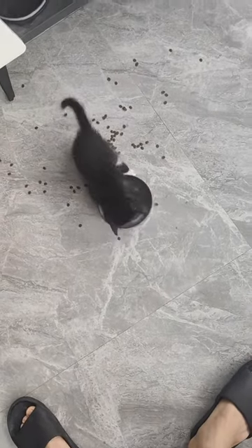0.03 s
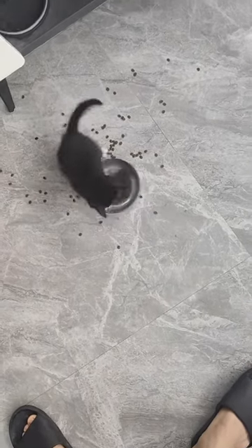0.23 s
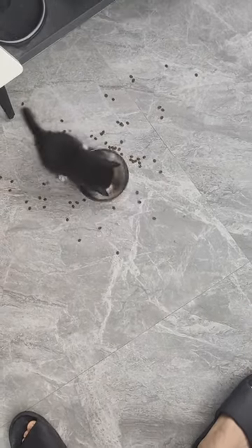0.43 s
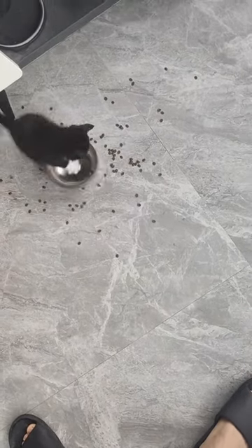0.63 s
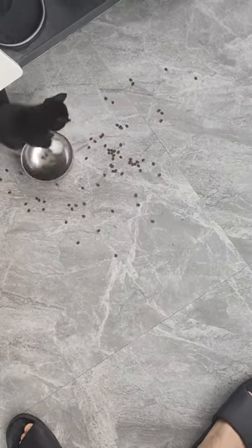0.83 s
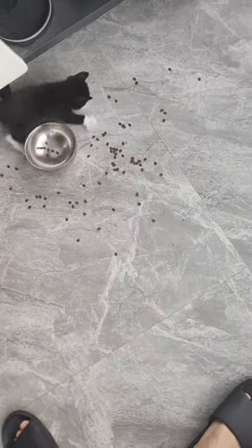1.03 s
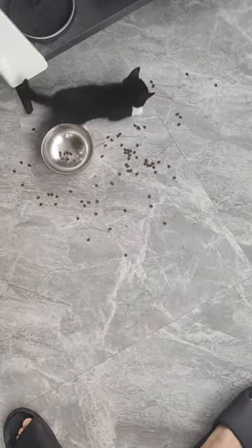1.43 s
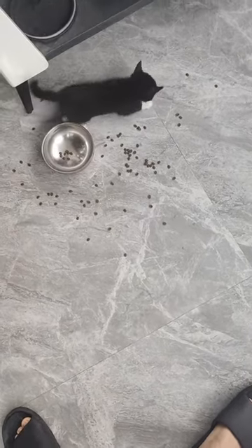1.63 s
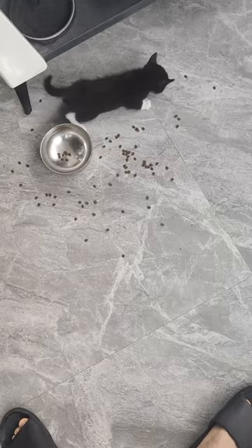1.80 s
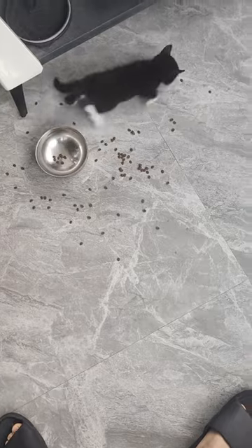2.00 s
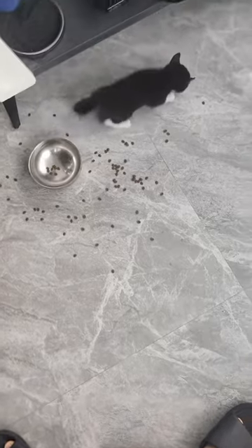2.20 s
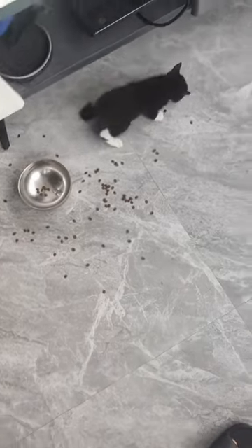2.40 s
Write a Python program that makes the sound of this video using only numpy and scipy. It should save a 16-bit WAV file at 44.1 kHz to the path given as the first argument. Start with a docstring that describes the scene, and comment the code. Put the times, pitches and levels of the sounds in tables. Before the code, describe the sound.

Close by indoors, a metal food bowl judders and clatters across tiles, with a little kibble shifting. It then wobbles on its rim, ringing as it settles, and leaves a low hum dying away over faint room rumble.

```python
"""Steel bowl on tile

Close by, in a hard-walled room, a kitten shoves a steel food bowl over the tiled floor. Its foot
judders, knocks and squeals; let go, the bowl drops back, rocks to rest with a sinking ring and hums
on in a low, beating tone. Kibble shifts, a paw lands, and a faint room rumble lies below. The bowl is
straight ahead of the microphone; only the treble of the reverberation spreads to the sides."""
import sys
import numpy as np
from scipy import signal
from scipy.fft import rfft, irfft
from scipy.io import wavfile

SR = 44100
rng = np.random.default_rng(int(sys.argv[2]) if len(sys.argv) > 2 else 0)


def transcribe(signal):
    """Save signal, clipped to [-1, 1], as a 16-bit WAV file at the path in sys.argv[1]."""
    frames = np.atleast_2d(signal).T
    limited = np.clip(frames, -1, 1)
    pcm = np.round(limited * 32767).astype(np.int16)
    wavfile.write(sys.argv[1], SR, pcm)


N = 112454
T = np.arange(N) / SR


# The foot scraping over the floor. Each row: time in seconds, relative force in dB.
PUSH_FORCE = [(0, -38.5), (.09, -51), (.2, -35.5), (.232, -19), (.285, -12.5), (.31, -32.5), (.34, -30.5),
              (.375, -21), (.41, -15), (.455, -13), (.55, -10), (.6, -13), (.66, -22), (.755, -29),
              (.77, -28), (.8, -13.5), (.84, -26.5), (.895, -8.5), (.955, -13), (.98, -53.5), (1.11, -60.5)]
# The rim rolling on the tile once free. Each row: time in seconds, relative force in dB.
ROLL_FORCE = [(1.125, -9), (1.21, -17), (1.29, -13.5), (1.345, -20.5), (1.385, -13.5), (1.44, -18.5),
              (1.485, -18.5), (1.52, -26), (1.6, -28.5), (1.65, -44), (1.7, -80)]
# The shell's contact noise, heard close. Each row: frequency in Hz, relative level in dB.
SHELL_SPECTRUM = [(60, -47.5), (150, -36.5), (240, -5), (450, -7.5), (800, -2), (1100, -2.5), (1350, -7),
                  (1530, -19), (1950, -13), (2450, -4), (2780, -7), (3030, -3.5), (3190, -15.5), (3380, -2),
                  (3700, -8), (4250, -19), (5000, -13.5), (5750, -24.5), (6400, -15.5), (7500, -18),
                  (9000, -22), (10500, -21.5), (14000, -35)]

def bowl(scrape_db=-4, roll_db=-5, pushed_ring_db=-4, free_ring_db=-7):
    """Scraping, rolling and knocks sound the shell broadly and ring its modes."""
    push = force(PUSH_FORCE) * slips()
    roll = force(ROLL_FORCE) * wobble() * slips()
    hits, blows = knocks()
    contact = colour(from_db(scrape_db) * push + from_db(roll_db) * roll + hits, SHELL_SPECTRUM)
    free = T > PUSH_FORCE[-1][0] - .02
    pushed_force = from_db(pushed_ring_db) * (push + blows * ~free)
    free_force = from_db(free_ring_db) * (roll + blows * free)
    return contact, shell_modes(pushed_force, free_force)


def slips(per_s=1400, spread_db=3.5, judder_hz=75.4, judder_db=3.5):
    """Tiny stick-slip clicks that come in juddering clumps; rms 1."""
    sizes = from_db(spread_db * np.minimum(rng.exponential(1, N), 4)) * rng.choice([-1, 1], N)
    judder = rms_one(butter(rng.standard_normal(N), judder_hz, "low"))
    slipping = rng.random(N) < per_s / SR
    return rms_one(sizes * slipping * from_db(judder_db * np.clip(judder, -2, 2)))


def wobble(start_hz=18, doubling_s=.3, depth_db=3.5):
    """Gain of the rocking, which speeds up as the bowl settles."""
    rate = start_hz * 2 ** (np.clip(T - ROLL_FORCE[0][0], 0, .5) / doubling_s)
    return from_db(depth_db * np.sin(2 * np.pi * np.cumsum(rate) / SR))


# Steel knocks on tile in front of the microphone.
# Each row: start in seconds, relative level in dB, offset for the ring in dB.
TILE_KNOCKS = [(0.16, -29.5, 3.5), (.204, -14.5, -2), (.229, -16, -3.5), (0.344, -14, -3),
               (.419, -12.5, 12), (0.452, -11.5, -29), (0.515, -29, 23.5), (0.532, -4, -12.5),
               (.764, -4.5, -7), (0.783, -4, -2), (0.852, -9.5, -5), (0.945, -10.5, 4.5), (0.955, -9.5, 6),
               (1.02, -18, 9.5), (1.124, -10, 7), (1.194, -17.5, 21.5), (1.249, -9, 8), (1.357, -14.5, 13),
               (1.415, -5, -19), (1.465, -7, 1.5), (1.501, -21.5, 13.5), (1.576, -14.5, 0.5)]

def knocks(decay_s=.0051, click=.83):
    """Each knock is a click and a few milliseconds of chatter: force on the shell and on its modes."""
    hits, blows, chatter = np.zeros(N), np.zeros(N), rng.standard_normal(N)
    for s, db, ring_db in TILE_KNOCKS:
        start = int(s * SR)
        hit = from_db(db) * chatter[start:] * np.exp(-T[:N - start] / decay_s)
        hit[0] = from_db(db) * click
        hits[start:] += hit
        blows[start] += from_db(db + ring_db) * np.sqrt(decay_s * SR)
    return hits, blows


# The bowl's modes. Each row: frequency in Hz, gain in dB while pushed, gain in dB when free,
# T60 in seconds, share of the tilt glide.
BOWL_MODES = [(526, -13, -20, .25, 0), (905, -7, -12, .17, 1), (1050, -12, -16, .2, 0),
              (1114, -11, -11, .22, .5), (1715, -11, -19, .25, .5), (1776, -12, -26, .32, 0),
              (2210, -19, -21, .7, 0), (2410, -13, -13, .22, .4), (2545, -12, -14, .22, .4),
              (2953, -20, -12, .35, 0), (3025, -19, -14, .3, 0), (3357, -12, -14, .26, 0),
              (3535, -16, -11, .25, .1), (3768, -16, -24, .25, 0), (3914, -20, -28, .25, 0),
              (4490, -22, -25, .35, .1), (4717, -26, -31, .25, 0), (6230, -27, -27, .2, .2),
              (6380, -21, -20, .2, .2), (6920, -26, -25, .2, 0)]

def shell_modes(pushed_force, free_force):
    """The steel rings with one balance of modes while pushed and another when free."""
    out = np.zeros(N)
    for hz, pushed_db, free_db, t60, share in BOWL_MODES:
        drive = from_db(pushed_db) * pushed_force + from_db(free_db) * free_force
        out += ring(drive, tilted(hz, share), t60)
    return out


# The glide as the bowl tilts on the floor. Each row: time in seconds, pitch change in percent.
TILT_GLIDE = [(.25, -1), (.55, 1.5), (.8, -2), (.97, 2.2), (1.12, -.5), (1.21, .3), (1.29, -1.8),
              (1.39, -2.2), (1.5, -4.8), (1.6, -7.5)]

def tilted(hz, share):
    """A mode's pitch follows its share of the glide, sinking as the bowl settles flat."""
    glide = np.interp(T, *np.transpose(TILT_GLIDE)) / 100
    return hz * (1 + share * glide)


# The two singing partials. Each row: frequency in Hz, share of the tilt glide.
SINGING_PARTIALS = [(904, 1), (1735, .5)]
# The freed bowl rocks on the spot. Each row: middle in seconds, length in seconds,
# level of the lower partial in dB, level of the upper in dB.
BOWL_ROCKS = [(1.138, 0.041, -16, -31), (1.204, 0.12, -14.5, -31.5), (1.274, 0.063, -15, -24),
              (1.329, 0.056, -18, -23), (1.386, 0.074, -12, -25), (1.434, 0.045, -17, -19),
              (1.488, 0.058, -24, -28.5), (1.569, 0.12, -27.5, -33.5)]

def singing(width_hz=3):
    """The rocking bowl sings in two partials, swelling with each rock and sinking in pitch."""
    lower, upper = (wavering(tilted(hz, share), width_hz) for hz, share in SINGING_PARTIALS)
    return sum(arch(s - length / 2, length) * (from_db(lower_db) * lower + from_db(upper_db) * upper)
               for s, length, lower_db, upper_db in BOWL_ROCKS)


# Close, dry pings. Each row: start in seconds, frequency in Hz, level in dB, T60 in seconds.
MODE_PINGS = [(.345, 520, -22, .3), (.06, 2530, -37, .4), (.068, 3650, -35, .35), (.081, 900, -39, .4),
              (.09, 3070, -34, .35), (.155, 3590, -28, .25), (.205, 820, -19, .2), (.229, 520, -25, .5),
              (.229, 925, -17, .4), (.229, 1716, -22, .4), (.345, 900, -20, .25), (.345, 2555, -27, .4),
              (.419, 581, -20, .7), (.455, 3357, -13, .4), (.514, 6400, -24, .25), (.531, 2555, -18, .3),
              (.531, 990, -13, .2), (.764, 880, -11, .15), (.775, 4485, -20, .35), (.853, 3350, -15, .25),
              (.943, 1720, -19, .35), (1.124, 3535, -9, .28), (1.249, 3535, -14, .22),
              (1.357, 6925, -26, .3), (1.413, 2953, -19, .25), (1.465, 3000, -16, .2)]

def pings():
    """A contact singles out one mode of the bowl."""
    return sum(struck(*row) for row in MODE_PINGS)


# The bowl's long hum. Each row: frequency in Hz, relative level in dB, T60 in seconds.
HUM_MODES = [(581, -22.5, 1.7), (570.8, -25.5, 1.7), (2195, -40, 1.4)]
# The blows that set it going. Each row: start in seconds, gain in dB.
HUM_STRIKES = [(.935, -2), (1.4255, -7)]

def hum():
    """A close pair of low modes rings long and beats, under a faint overtone."""
    return sum(struck(s, hz, db + blow_db, t60) for s, blow_db in HUM_STRIKES for hz, db, t60 in HUM_MODES)


def overtones(contact, count=600, low_hz=5946, high_hz=13700, t60=.24, db=-9):
    """The thin shell's many weak high modes, scattered at random, make each contact metallic."""
    t = T[:SR // 2]
    pitch, phase, strength = rng.random((count, 3)).T[:, :, None]
    hz = low_hz + pitch * (high_hz - low_hz)
    response = np.sum(strength * np.sin(2 * np.pi * (hz * t + phase)), axis=0) * decay(t, t60)
    return from_db(db) * convolve_unit(contact, response)


# Skids down at the tile. Each row: start in seconds, length in seconds, relative level in dB.
EDGE_SKIDS = [(0, 0.0073, -26), (0.212, 0.033, -28), (0.227, 0.014, -25.5), (0.348, 0.003, -21.5),
              (0.362, 0.029, -15), (0.402, 0.02, -24), (0.62, 0.017, -19), (0.638, 0.03, -19.5),
              (0.668, 0.029, -27), (0.72, 0.008, -14), (0.802, 0.035, -23), (0.846, 0.014, -21.5),
              (0.855, 0.022, -17), (0.901, 0.0042, -17.5)]
# Their hiss from nearby. Each row: frequency in Hz, relative level in dB.
SKID_SPECTRUM = [(200, -58), (4000, -19), (5800, -13.5), (7200, 2), (8600, -2), (10500, 0.5), (12000, -4.5),
                 (14000, -11)]

def skids(attack_s=.001, release_s=.0021):
    """The steel edge catches and skids with a short bright hiss."""
    envelope = sum(from_db(db) * burst(s, length, attack_s, release_s) for s, length, db in EDGE_SKIDS)
    return envelope * colour(rng.standard_normal(N), SKID_SPECTRUM)


# Squeals near the microphone, with little room on them.
# Each row: start in seconds, length in seconds, frequency in Hz, relative level in dB.
EDGE_SQUEALS = [(.364, .06, 7500, -27.5), (.385, .075, 9450, -26.5), (.633, .04, 8460, -16.5),
                (.64, .07, 9400, -24), (.722, .014, 7600, -10.5), (.857, .045, 8150, -18),
                (.859, .066, 6868, -14.5)]

def squeals(upper_ratio=1.905, upper_db=-10, width_hz=130):
    """The sticking edge gives a rough two-partial squeal that stops when it lets go."""
    out = np.zeros(N)
    for s, length, hz, db in EDGE_SQUEALS:
        tone = wavering(hz, width_hz) + from_db(upper_db) * wavering(hz * upper_ratio, width_hz)
        out += from_db(db) * burst(s, length, attack_s=.001, release_s=.006) * tone
    return out


# Kibble shifts in the bowl and on the floor. Each row: start in seconds, length in seconds,
# relative level in dB, band centre in Hz, bandwidth in Hz.
KIBBLE_SHIFTS = [(0.02, 0.16, -37, 3400, 1210), (0.048, 0.15, -32, 9000, 5500), (1.8, 0.05, -66, 7270, 900),
                 (2.028, 0.16, -63.5, 6880, 2453), (2.42, 0.16, -66, 2890, 80)]
# The last quick rocks thrum and ring thinly against the floor. Each row reads as for the kibble.
RIM_THRUM = [(1.56, .21, -42, 331, 200), (1.58, 0.064, -42.5, 4530, 110)]

def rustle(rows):
    """Short swells of tiny contacts in one band: sliding pellets, or the rim's last thrum."""
    out, grit = np.zeros(N), slips()
    for s, length, db, hz, width_hz in rows:
        band = butter(grit, [max(hz - width_hz / 2, 100), hz + width_hz / 2], "band")
        out += from_db(db) * np.sqrt(arch(s, length)) * rms_one(band)
    return out


# One soft step on the tile. Each row: start in seconds, level in dB, frequency in Hz.
PAW_STEPS = [(2.345, -46, 518)]

def paws(rise_s=.015, width_hz=79):
    """A padded paw lands with a dull pat."""
    out = np.zeros(N)
    for s, db, hz in PAW_STEPS:
        age = np.maximum(T - s, 0) / rise_s
        out += from_db(db) * age * np.exp(1 - age) * wavering(hz, width_hz)
    return out


def room(x, t60=.42, bass_t60=.21, bass_hz=390, delay_s=.0029):
    """The hard walls return a diffuse tail of unit power; its bass dies sooner."""
    t, noise = T[:SR], rng.standard_normal(SR)
    bass = signal.sosfiltfilt(signal.butter(2, bass_hz, fs=SR, output="sos"), noise, padtype=None)
    tail = bass * decay(t, bass_t60) + (noise - bass) * decay(t, t60)
    return convolve_unit(x, tail * (t > delay_s))


# Room tone at the microphone. Each row: frequency in Hz, relative level in dB.
AIR_SPECTRUM = [(25, -17.5), (50, -5), (95, -10), (130, -9), (180, -9.5), (260, -20.5), (480, -15),
                (900, -20), (1500, -27.5), (3000, -33.5), (4600, -36), (5400, -45.5), (8000, -46),
                (14000, -52)]
# An appliance in the background. Each row: frequency in Hz, level in dB.
APPLIANCE_TONES = [(90, -52), (178, -58.5)]

def background(air_db=-49.5, drone_width_hz=14):
    """Rumbling room air and a faint, wavering appliance drone."""
    air = from_db(air_db) * colour(rng.standard_normal(N), AIR_SPECTRUM)
    return air + sum(from_db(db) * wavering(hz, drone_width_hz) for hz, db in APPLIANCE_TONES)


def from_db(db):
    """Decibels to gain."""
    return 10 ** (np.asarray(db) / 20)


def rms_one(x):
    """Scale to unit rms."""
    return x / np.sqrt(np.mean(x ** 2) + 1e-20)


def force(rows):
    """Gain along a level curve, silent outside it."""
    return from_db(np.interp(T, *np.transpose(rows), left=-120, right=-120))


def decay(t, t60):
    """A fall of 60 dB every t60 seconds."""
    return np.exp(-np.log(1000) * t / t60)


def burst(s, length, attack_s, release_s):
    """Attack, hold and release."""
    return np.clip((T - s) / attack_s, 0, 1) * np.exp(-np.clip(T - s - length, 0, .2) / release_s)


def arch(s, length):
    """A half-sine swell."""
    return np.abs(np.sin(np.pi * np.clip((T - s) / length, 0, 1)))


def butter(x, hz, kind, order=2):
    """Butterworth filter."""
    return signal.sosfilt(signal.butter(order, hz, kind, fs=SR, output="sos"), x)


def convolve_unit(x, response):
    """Apply an impulse response scaled to unit energy."""
    return signal.fftconvolve(x, response / np.linalg.norm(response))[:N]


def colour(x, points, size=4096):
    """Minimum-phase filter with the given spectrum and unit power gain."""
    hz, db = np.transpose(points)
    log_bins = np.log(np.fft.rfftfreq(size, 1 / SR) + 1)
    gain = rms_one(from_db(np.interp(log_bins, np.log(hz), db)))
    cepstrum = irfft(np.log(gain))
    cepstrum[1:size // 2] *= 2
    cepstrum[size // 2 + 1:] = 0
    return signal.fftconvolve(x, irfft(np.exp(rfft(cepstrum))))[:N]


def ring(x, hz, t60):
    """A driven mode whose pitch may glide; unit power gain for noise."""
    turn = np.exp(2j * np.pi * np.cumsum(hz * np.ones(N)) / SR)
    pole = decay(1 / SR, t60)
    amplitude = signal.lfilter([1], [1, -pole], x / turn + 1e-18)
    return np.sqrt(2 * (1 - pole ** 2)) * (turn * amplitude).imag


def struck(s, hz, db, t60):
    """One mode struck once."""
    age = np.maximum(T - s, 0)
    return from_db(db) * np.sin(2 * np.pi * hz * age) * decay(age, t60)


def wavering(hz, width_hz):
    """A tone of steady strength whose phase wanders; rms 1."""
    wander = np.sqrt(2 * np.pi * width_hz / SR) * butter(rng.standard_normal(N), 4 * width_hz, "low")
    return np.sqrt(2) * np.sin(np.cumsum(2 * np.pi * hz / SR + wander))


def scene(low_cut_hz=240, wide_above_hz=6800):
    """Bowl and room as at a mid-side microphone: only the treble of the reverberation is wide."""
    contact, rings = bowl()
    rings = butter(rings, low_cut_hz, "high")
    contact += skids()
    contact = butter(contact + overtones(contact), low_cut_hz, "high", order=4)
    contact += rustle(KIBBLE_SHIFTS) + rustle(RIM_THRUM)
    squeal = squeals()
    direct = from_db(-4) * (contact + squeal) + from_db(-2) * rings
    to_walls = from_db(-3) * (contact + from_db(-8) * rings + from_db(-11) * squeal)
    mid = direct + hum() + singing() + pings() + room(to_walls) + paws() + background()
    side = from_db(-6) * butter(room(to_walls), wide_above_hz, "high", order=8)
    return np.array([mid + side, mid - side])


def record(dry, ceiling=.86, cutoff_hz=13700):
    """Peaks are rounded below full scale and the highest treble is cut."""
    dry = butter(dry, 15000, "low", order=6)
    rounded = dry / (1 + (dry / ceiling) ** 4) ** .25
    return signal.sosfilt(signal.ellip(10, .1, 90, cutoff_hz, fs=SR, output="sos"), rounded)


dry = scene()
out = record(dry)
transcribe(out)
```